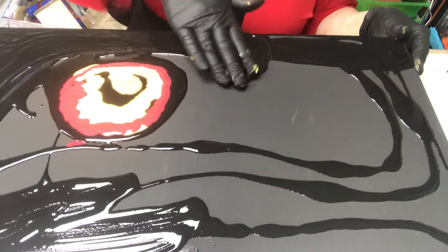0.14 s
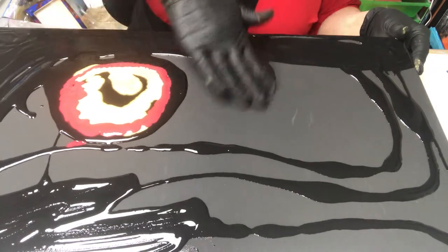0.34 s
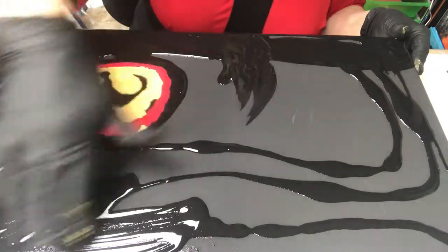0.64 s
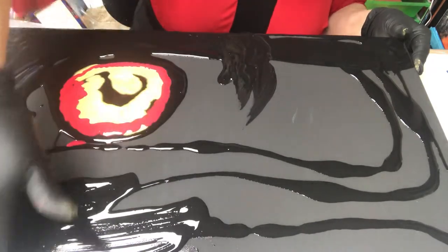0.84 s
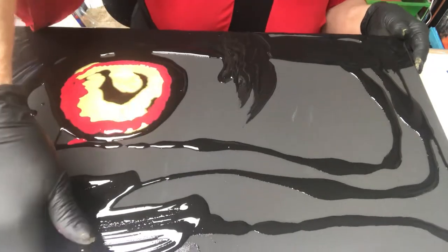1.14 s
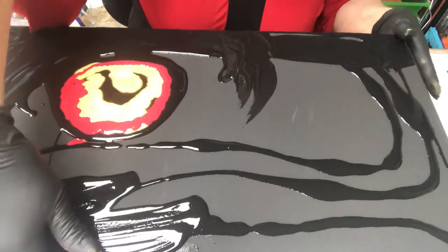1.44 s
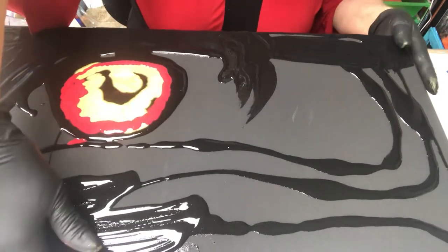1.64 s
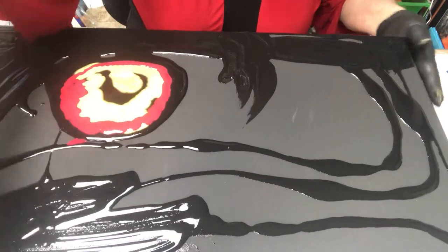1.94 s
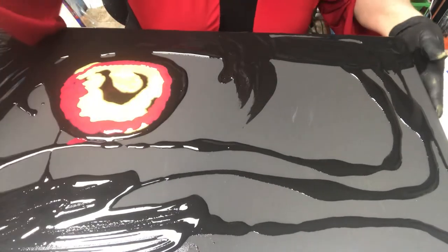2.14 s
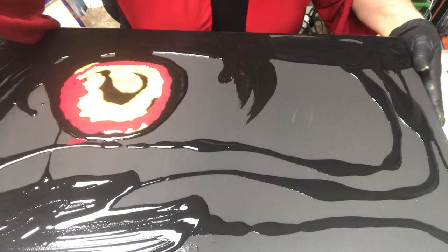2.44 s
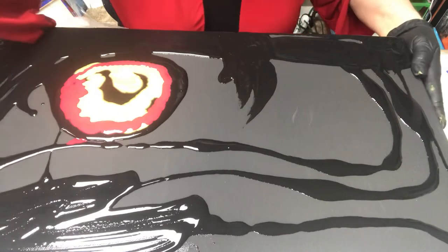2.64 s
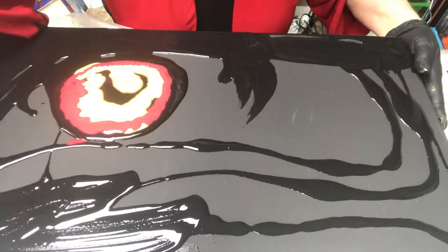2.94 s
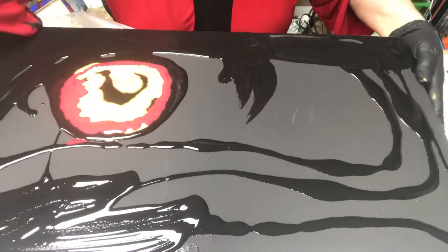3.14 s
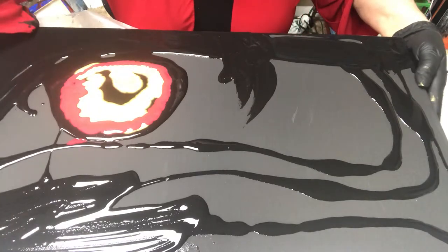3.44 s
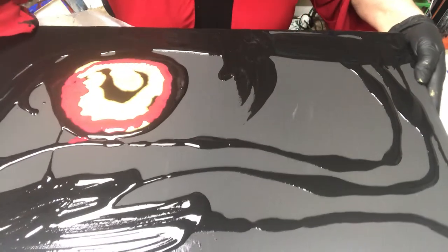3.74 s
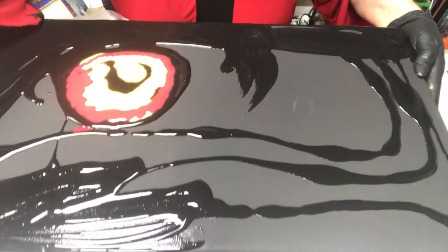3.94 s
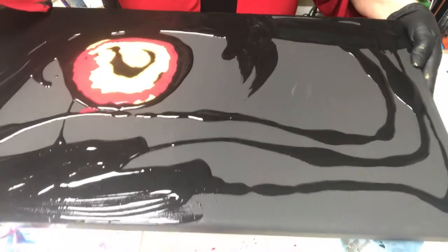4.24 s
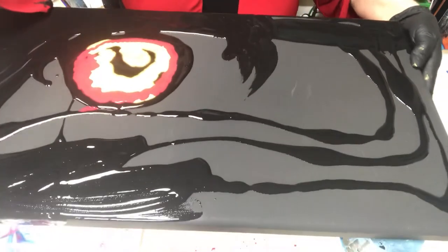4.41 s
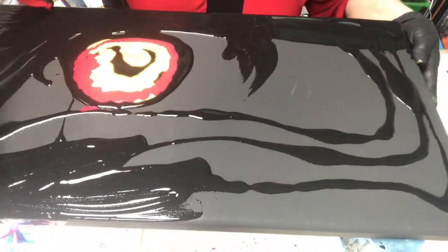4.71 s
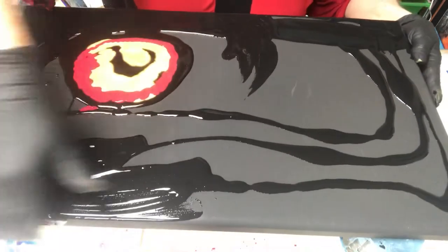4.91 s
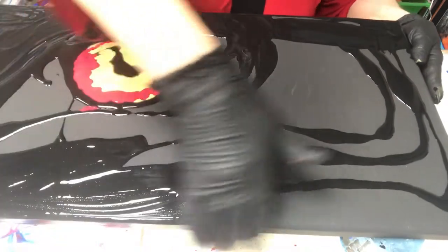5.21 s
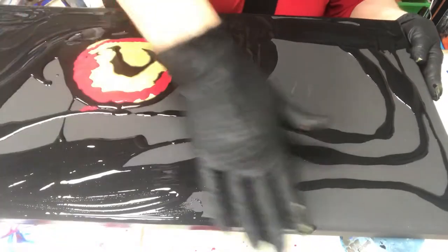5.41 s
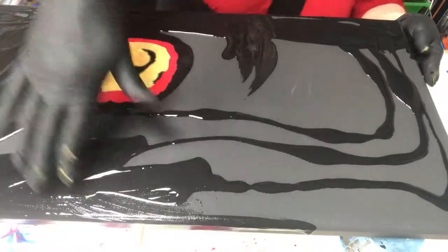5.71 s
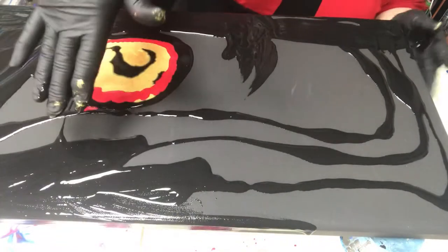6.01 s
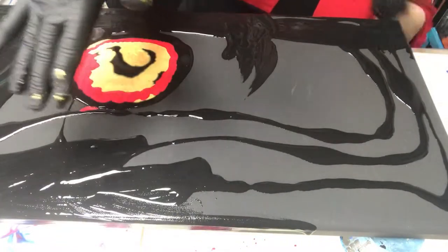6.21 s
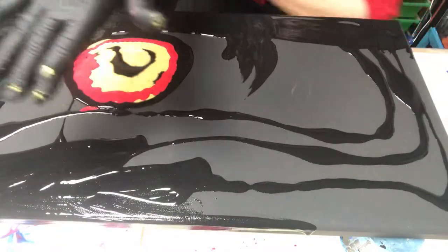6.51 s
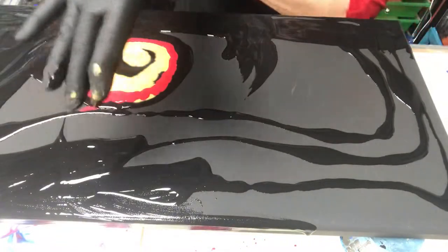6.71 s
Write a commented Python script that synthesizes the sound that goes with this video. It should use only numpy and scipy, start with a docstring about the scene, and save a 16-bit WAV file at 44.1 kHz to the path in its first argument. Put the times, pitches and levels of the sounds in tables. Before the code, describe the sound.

A close, mostly quiet indoor scene with little reverberation; faint sleeve rustle, glove crinkle and bass-heavy room air run throughout. From 0 to 0.5 s a rubber glove swishes softly through wet paint, the second swipe quicker and hissier, with a faint tap at 0.2. Dry, soft rubs begin around 0.9; a hollow knock with a low thud lands at 1.2, others at 1.55 and 2.0. Sticky ticks pop near 2.1, 2.55 and 2.9 among slightly squeaky rubs. More rubs and small taps come at 3.3-3.7. From 3.85 to 4.4 the frame drags: a low, juddering stick-slip groan, falling in pitch, with gritty scraping, wooden bumps near 4.05 and very sharp clicks at 4.35-4.43, the loudest moment. A quiet lull follows. Wet sweeps run 4.5-5.7, quickening, with a knock at 5.2 and a bubbly squelch around 5.6. At 6.07 a dull thump and short skid, then faint rubs fade until 6.9.

```python
"""Gloved fingers smear wet paint over a stretched canvas in a small room: shaped noise hisses and squeaks.
Dry rubs follow, with frame knocks as decaying wood and canvas modes, and sticky ticks as short noise bursts.
Midway the frame is dragged: a stick-slip tone groans near the canvas resonance, with scrapes, bumps, clicks.
More wet sweeps follow, one with a squelch of tiny decaying sines; then a thump, a skid and fading rubs.
Sleeve rustle, glove crinkle and room air, all coloured noise, run throughout."""
import sys
import numpy as np
from scipy import signal
from scipy.fft import rfft, irfft, next_fast_len
from scipy.io import wavfile
from scipy.ndimage import map_coordinates

SR = 44100
rng = np.random.default_rng(int(sys.argv[2]) if len(sys.argv) > 2 else 0)


def master_out(mix):
    """Clip the mix to full scale and print it as 16-bit PCM to the path in sys.argv[1]."""
    frames = np.transpose(np.atleast_2d(mix))
    ceiling = np.clip(frames, -1, 1)
    pcm = np.round(ceiling * 32767).astype(np.int16)
    wavfile.write(sys.argv[1], SR, pcm)


N = 302526

# glove rubber friction spectrum: [f/Hz, density/dB per Hz]
RUBBER_SPECTRUM = [(530, -68), (900, -22), (1390, -13), (1880, -9.5), (2660, -1.5), (4380, -3), (6060, -8),
                   (12000, -22), (15600, -44)]
# cloth friction spectrum: [f/Hz, density/dB per Hz]
CLOTH_SPECTRUM = [(60, -3), (140, -13), (280, -4), (580, 2), (720, -9), (1200, -3.5), (2000, -10),
                  (4000, -54)]


def amp(db):
    """Decibels to gain."""
    return 10 ** (np.asarray(db) / 20)


def unit(x):
    """Scale to rms 1."""
    return x / np.sqrt(np.mean(x ** 2) + 1e-20)


def along(points, hz):
    """Interpolate (f/Hz, value) points on a log frequency axis."""
    f, v = np.transpose(points)
    return np.interp(np.log(hz + 1), np.log(f + 1), v)


def curves(rows):
    """One value per sample for each column after the time."""
    s, *columns = np.transpose(rows)
    return [np.interp(np.arange(N) / SR, s, c) for c in columns]


def wobble(rate_hz, size=N):
    """Smooth random curve with rate_hz knots per second."""
    knots = rng.standard_normal(int(size * rate_hz / SR) + 4)
    return map_coordinates(knots, [np.arange(size) * rate_hz / SR])


def filtered(x, response):
    """Multiply the spectrum of x by a response of frequency."""
    m = next_fast_len(len(x) + 8192)
    spectrum = rfft(x, m) * response(np.fft.rfftfreq(m, 1 / SR))
    return irfft(spectrum, m)[:len(x)]


def coloured(x, spectrum):
    """Shape x by a dB spectrum, at rms 1."""
    return unit(filtered(x, lambda hz: amp(along(spectrum, hz))))


def resonance(hz, centre_hz, width):
    """Causal band-pass; width is a share of the centre."""
    damping = 1j * hz * width * centre_hz
    return damping / (centre_hz ** 2 - hz ** 2 + damping)


def friction(spectrum, rate_hz, grain_db, size=N):
    """Friction as countless tiny slips (noise) plus larger random ones, rate_hz per second on average."""
    slips = (rng.random(size) < rate_hz / SR) * rng.standard_normal(size)
    return coloured(rng.standard_normal(size) + amp(grain_db) * unit(slips), spectrum)


def add(track, s, x):
    """Mix x into the track at s seconds."""
    part = track[round(s * SR):][:len(x)]
    part += x[:len(part)]


def smears():
    """Hand sweeps through wet paint gather speed until a quick lift-off."""
    # sweeps: [start t/s, end t/s, rasp level/dB, hiss level/dB, murmur level/dB, squeak level/dB, squeak f/Hz]
    sweeps = [(-.25, 0.205, -63.5, -67.5, -66.5, -64.5, 4210),
              (0.292, 0.497, -57.5, -50.5, -54.5, -56.5, 4740),
              (4.519, 5.374, -62, -61.5, -81, -66.5, 3586), (5.352, 5.736, -60.5, -58.5, -69.5, -59, 4565),
              (5.514, 5.66, -52.5, -64, -66, -54.5, 3413), (5.636, 5.734, -55, -64.5, -80, -57, 4610)]
    lift_s = 0.046
    out = np.zeros(N)
    for start, end, *levels_and_pitch in sweeps:
        peak = max(1 - lift_s / (end - start), .5)
        add(out, max(start, 0), stroke(start, end, peak, *levels_and_pitch))
    return out


def rubs():
    """Short, drier rubs of the glove on frame and canvas peak early."""
    # rubs: [start t/s, end t/s, rasp level/dB, squeak level/dB, squeak f/Hz]
    dry_rubs = [(0.909, 1.117, -67, -86, 3480), (1.2, 1.512, -62, -86, 3920),
                (1.939, 2.023, -70.5, -67.5, 2960), (2.047, 2.315, -66.5, -73, 2440),
                (2.32, 2.462, -62, -63.5, 3320), (2.43, 2.87, -65.5, -69, 2910),
                (2.75, 3.156, -72, -72, 2970), (3.321, 3.424, -61, -68, 3950),
                (3.508, 3.72, -58, -65, 2060), (3.718, 4.116, -64, -67, 2444),
                (4.097, 4.322, -59, -60, 3575), (4.74, 5.323, -69.5, -69, 1206),
                (5.781, 6.29, -71.5, -75, 1268), (6.007, 6.18, -64, -66, 2630),
                (6.52, 6.892, -68.5, -79, 3630)]
    peak = 0.21  # share of the rub spent gathering speed
    hiss_rel_db, murmur_rel_db = -16.5, -3  # relative to the rasp setting
    out = np.zeros(N)
    for start, end, db, squeak_db, squeak_hz in dry_rubs:
        rub = stroke(start, end, peak, db, db + hiss_rel_db, db + murmur_rel_db, squeak_db, squeak_hz)
        add(out, start, rub)
    return out


def stroke(start, end, peak, rasp_db, hiss_db, murmur_db, squeak_db, squeak_hz):
    """The glove rasps and squeaks where it grips, hisses over wet paint and stirs the cloth beneath."""
    # wet paint spectrum: [f/Hz, density/dB per Hz]
    wet_spectrum = [(240, -59), (400, -18), (654, -12), (798, -5), (903, -7.5), (1150, -2), (1920, -11),
                    (2990, -8), (5360, -7.5), (6540, -9.5), (11900, -11), (15700, -11.5)]
    hiss_power, murmur_power = 1.83, 0.56  # powers of hand speed; the rasp follows speed directly
    t = np.arange(round(max(start, 0) * SR), round(end * SR)) / SR
    size = len(t)
    done = (t - start) / (end - start)
    gather = np.sin(np.pi / 2 * np.clip(done / peak, 0, 1))
    lift = 1 - np.clip((done - peak) / (1 - peak), 0, 1) ** 3  # leaves more abruptly than it arrives
    speed = gather * lift
    rub = friction(RUBBER_SPECTRUM, rate_hz=170, grain_db=-5, size=size)
    grip = amp(rasp_db) * rub + amp(squeak_db) * squeak(squeak_hz, size)
    rasp = amp(1.37 * wobble(88.2, size)) * grip
    hiss = amp(hiss_db + 4.0) * friction(wet_spectrum, rate_hz=1600, grain_db=-7, size=size)
    cloth = friction(CLOTH_SPECTRUM, rate_hz=300, grain_db=-4, size=size)
    murmur = amp(murmur_db + 1.3 * wobble(30.6, size)) * cloth
    mix = speed * rasp + speed ** hiss_power * hiss + speed ** murmur_power * murmur
    return amp(0.67 * wobble(28.2, size)) * mix


def squeak(pitch_hz, size):
    """Taut rubber rings in a fuzzy band whose pitch wanders with the grip."""
    # band width, fuzzier when high: [f/Hz, width/share of pitch]
    band_width = [(1200, .17), (3550, .22), (4500, .45)]
    drift, drift_rate_hz = .035, 22  # share of pitch; wanders per second
    pitch = pitch_hz * (1 + drift * wobble(drift_rate_hz, size))
    phase = 2 * np.pi * np.cumsum(pitch) / SR
    width_hz = along(band_width, pitch_hz) * pitch_hz
    return unit(wobble(width_hz, size) * np.cos(phase) + wobble(width_hz, size) * np.sin(phase))


def squelch(count):
    """Paint peels off the glove in a rush of tiny bubbles, each a decaying sine of its own pitch and level."""
    middle_s, spread_s, level_db, centre_hz = 5.605, .05, -48, 2650
    scatter_octaves, scatter_db, t60_s = .2, 8.5, .014
    out, t = np.zeros(N), np.arange(SR // 40) / SR
    for when, pitch, size in rng.uniform(-0.86, 1, (count, 3)):
        hz = centre_hz * 2 ** (scatter_octaves * pitch)
        envelope = amp(level_db + scatter_db * size - 60 * t / t60_s)
        add(out, middle_s + spread_s * when, envelope * np.sin(2 * np.pi * hz * t))
    return out


def skid():
    """The glove skids off the frame: rubber and cloth friction start at once and die away."""
    start_s, level_db, t60_s = 6.068, -44.5, 0.18
    out, t = np.zeros(N), np.arange(SR // 2) / SR
    rubber = friction(RUBBER_SPECTRUM, rate_hz=270, grain_db=-4, size=len(t))
    cloth = amp(1) * friction(CLOTH_SPECTRUM, rate_hz=93, grain_db=-5, size=len(t))
    envelope = amp(level_db - 60 * t / t60_s) * (1 - np.exp(-t / 0.0024))
    add(out, start_s, envelope * amp(1.7 * wobble(110, len(t))) * (rubber + cloth))
    return out


def dragging():
    """The frame sticks and slips, louder and cleaner near the canvas resonance; slips pulse the grit scrape."""
    # stick-slip rate: [t/s, rate/slips per second]
    slip_rate = [(3.83, 182), (3.925, 246), (3.98, 204), (4.02, 192), (4.06, 149), (4.115, 128.5),
                 (4.17, 143), (4.21, 142), (4.375, 150), (4.41, 127)]
    # tugs: [start t/s, end t/s, groan level at resonance/dB, octave level re groan/dB]
    tugs = [(3.855, 3.975, -19.5, -29), (3.983, 4.044, -23.5, -30), (4.05, 4.127, -22.5, -20),
            (4.111, 4.188, -31.5, -0.5), (4.15, 4.4, -19.5, -27)]
    # scrapes over grit: [start t/s, end t/s, level/dB]
    scrapes = [(3.689, 4.15, -57), (4.067, 4.248, -47), (4.19, 4.393, -41.5)]
    # grit spectrum: [f/Hz, density/dB per Hz]
    grit_spectrum = [(150, -14), (280, 2.5), (390, -2.5), (520, 1), (660, -17.5), (950, -5), (1800, -19),
                     (2800, -26.5), (3600, -21), (5000, -33.5), (15000, -44)]
    canvas_hz, canvas_width = 141.6, .17  # width as a share of the centre
    rough_free, rough_locked = 0.551, 0.12  # roughness 0-1, off and on resonance
    judder_db = -3.5  # irregular shudder, re groan
    judder_spectrum = [(25, -30), (45, -2), (90, -1), (130, 12), (220, 12.5), (290, 0), (400, -36)]

    rate, = curves(slip_rate)
    lock = abs(resonance(rate, canvas_hz, canvas_width))
    level = lock * sum(amp(db) * tug(start, end) for start, end, db, _ in tugs)
    octave = lock * sum(amp(db + octave_db) * tug(start, end) for start, end, db, octave_db in tugs)
    rough = rough_free + (rough_locked - rough_free) * lock
    phase = 2 * np.pi * np.cumsum(rate * (1 + 0.0857 * rough * wobble(110))) / SR
    tone = level * np.sin(phase) + octave * np.sin(2 * phase)
    tone = tone * amp(4.1 * rough * wobble(130))
    judder = coloured(rng.standard_normal(N), judder_spectrum)
    groan = tone + amp(judder_db + 3.7 * wobble(35)) * level * rough * judder
    stutter = amp(2.8 * wobble(110)) * (1 + .8 * np.cos(phase))
    scrape = sum(amp(db) * tug(start, end) for start, end, db in scrapes)
    return groan + scrape * stutter * friction(grit_spectrum, rate_hz=380, grain_db=-9.5)


def tug(start, end):
    """Pull of one tug, 0-1: a half sine leaning early and raised to a fuller arch."""
    arch, lean = 0.62, 0.68  # exponents; lean under 1 peaks early
    done = np.clip((np.arange(N) / SR - start) / (end - start), 0, 1)
    return np.clip(np.sin(np.pi * done ** lean), 0, 1) ** arch


def knocks():
    """Each blow slaps and chatters, rings the wood briefly and leaves the canvas booming."""
    # blows: [t/s, level/dB, boom re level/dB, slap re level/dB, wood centre f/Hz, boom centre f/Hz]
    blows = [(0.216, -46.5, -23, -13, 565, 160), (1.176, -49.5, 0, -20, 500, 150),
             (1.223, -34.5, -6, -9, 794, 130), (1.229, -31, -6, -15, 560, 195),
             (1.564, -31, -18, -23, 700, 182), (1.766, -42.5, -4, -17, 780, 136),
             (1.785, -47, -7.5, -29, 550, 160), (2.024, -31.5, -5, -14, 770, 108),
             (2.089, -44.5, -9, -9, 564, 130), (3.313, -45.5, -5.5, -15, 398, 226),
             (3.57, -42.5, -11.5, -20, 540, 165), (3.722, -46.5, -1, -3, 656, 219),
             (4.044, -22.5, -7, -10, 630, 220), (4.092, -26.5, -3, -10, 800, 172),
             (4.097, -24, -13, -21, 650, 180), (4.386, -31, -7, -17, 945, 98),
             (4.43, -34, -10.5, -15.5, 560, 140), (5.178, -39, -13.5, -6, 600, 239),
             (6.072, -35.5, -8, -10, 315, 236)]
    # wooden frame modes: [f/Hz, level/dB, t60/s]
    wood_modes = [(286, -0.5, 0.048), (356.5, -3, 0.097), (418, -5.5, 0.07), (495, 1, 0.067),
                  (529, -6.5, 0.06), (585.6, 0, 0.068), (714, -10.5, 0.083), (786, -2.5, 0.054),
                  (868, -5.5, 0.057), (988, 0.5, 0.03), (1060, 1, 0.044), (1360, -4, 0.018)]
    # stretched canvas modes: [f/Hz, level/dB, t60/s]
    canvas_modes = [(49.4, -6, 0.51), (78.7, -2, 0.2), (113.7, -5, 0.17), (144.7, -1.5, 0.23),
                    (169.4, -6.5, 0.21), (215.2, -3, 0.13), (254.4, -2.5, 0.089)]
    # contact slap spectrum: [f/Hz, density/dB per Hz]
    slap_spectrum = [(500, -42), (1200, 4), (2000, -2.5), (3500, -8), (5000, -19.5), (14000, -30)]
    chatter_depth_db, chatter_rate_hz = 4.5, 212
    out, t = np.zeros(N), np.arange(SR // 4) / SR
    for s, db, boom_db, slap_db, wood_hz, boom_hz in blows:
        wood = amp(-10.0) * ring(wood_modes, t, wood_hz, width=0.78, attack_s=0.0008, scatter_db=2.5)
        boom = ring(canvas_modes, t, boom_hz, width=1.0, attack_s=0.00049, scatter_db=1.0)
        boom = amp(boom_db - 3.5) * boom
        decay = amp(-60 * t / 0.039) + amp(-16 - 60 * t / 0.12)
        contact = decay * (1 - np.exp(-t / 0.000085))
        chatter = amp(chatter_depth_db * wobble(chatter_rate_hz, len(t)))
        noise = coloured(rng.standard_normal(len(t)), slap_spectrum)
        slap = amp(slap_db) * contact * unit(chatter * noise)
        add(out, s, amp(db) * (wood + boom + slap))
    return out


def ring(modes, t, centre_hz, width, attack_s, scatter_db):
    """Damped modes, favoured near the centre of the blow; unit deviation over the first 20 ms."""
    hz, db, t60 = np.transpose(modes)[:, :, None]
    hz = hz * (1 + 0.016 * rng.standard_normal(hz.shape))  # the holding hand detunes the modes
    favour = abs(resonance(hz, centre_hz, width)) ** 2
    decay = amp(db + scatter_db * rng.standard_normal(hz.shape) - 60 * t / t60)
    waves = np.sin(2 * np.pi * (hz * t + rng.random(hz.shape)))
    x = np.sum(favour * decay * waves, axis=0) * (1 - np.exp(-t / attack_s))
    return x / np.std(x[:SR // 50])


def ticks():
    """Tacky paint lets go of the glove in narrow noise bursts."""
    # releases: [t/s, level/dB, pitch f/Hz]
    releases = [(2.0997, -36.5, 2460), (2.1556, -32.5, 2450), (2.5392, -35, 2180), (2.593, -44.5, 2300),
                (2.906, -32.5, 2300), (2.967, -41, 2900), (4.346, -27.5, 3270)]
    out = np.zeros(N)
    for s, db, pitch_hz in releases:
        add(out, s, amp(db) * snap(pitch_hz, width=0.6, t60_s=0.013))
    return out


def clicks():
    """The frame clicks on its supports in sharp, mostly broad noise bursts."""
    # contacts: [t/s, level/dB, pitch f/Hz, width/share of pitch, t60/s]
    contacts = [(1.316, -41, 4280, 1.2, 0.028), (2.325, -38, 3700, 1.4, 0.014),
                (3.7205, -32.5, 4830, 1.3, 0.013), (3.937, -41, 5460, 1.6, 0.012),
                (4.354, -22.5, 3944, 1.8, 0.023), (4.355, -18.5, 8970, 0.16, 0.0068),
                (4.4269, -13.5, 9200, 6.9, 0.0036), (5.178, -35, 4750, 1.9, 0.012),
                (5.928, -48.5, 4150, 1, 0.083), (6.67, -52, 2900, 1.7, 0.063)]
    out = np.zeros(N)
    for s, db, pitch_hz, width, t60_s in contacts:
        add(out, s, amp(db) * snap(pitch_hz, width, t60_s))
    return out


def snap(pitch_hz, width, t60_s):
    """Short noise burst around one pitch with a faint afterglow."""
    rise_s = 0.0003
    t = np.arange(SR // 10) / SR
    noise = rng.standard_normal(len(t))
    burst = unit(filtered(noise, lambda hz: resonance(hz, pitch_hz, width) ** 2))
    decay = amp(-60 * t / t60_s) + amp(-37 - 60 * t / 0.052)
    return amp(-4.5) * burst * (1 - np.exp(-t / rise_s)) * decay


def thuds():
    """Damped low noise swells as the frame shifts, then dies away."""
    # shifts: [start t/s, level/dB, centre f/Hz, rise/s, t60/s]
    shifts = [(1.2245, -27, 195, .006, .085), (2.03, -46.5, 125, 0.037, 0.38),
              (4.634, -47, 135, 0.051, 0.23), (5.8, -57, 220, 0.31, .6), (6.069, -39, 365, .004, .2)]
    width = 1.05  # share of the centre
    out, t = np.zeros(N), np.arange(SR) / SR
    for s, db, centre_hz, rise_s, t60_s in shifts:
        noise = rng.standard_normal(SR)
        body = unit(filtered(noise, lambda hz: resonance(hz, centre_hz, width) ** 3))
        decay = amp(db - 60 * np.maximum(t - rise_s, 0) / t60_s)
        add(out, s, decay * np.minimum(t / rise_s, 1) * body)
    return out


def room(x):
    """Convolve with a short diffuse noise tail, duller as it dies, after a 5 ms gap."""
    # room decay: [f/Hz, t60/s]
    room_decay = [(100, 0.55), (600, 0.27), (3000, 0.16), (12000, 0.075)]
    hz, t, z = signal.stft(rng.standard_normal(SR // 2), SR, nperseg=256)
    decay = amp(-60 * t / along(room_decay, hz)[:, None])
    tail = signal.istft(z * decay, SR, nperseg=256)[1]
    tail = np.pad(tail / np.linalg.norm(tail), (SR // 200, 0))
    return signal.fftconvolve(x, tail)[:N]


def sleeves():
    """Sleeve cloth rustles as dull friction with an unsteady level."""
    # sleeve spectrum: [f/Hz, density/dB per Hz]
    sleeve_spectrum = [(40, -4.5), (140, 2), (280, -4.5), (700, -13.5), (3000, -33.5)]
    level = amp(-70.5 + 1.6 * wobble(6.2) + 2.8 * wobble(24))
    return level * friction(sleeve_spectrum, rate_hz=50, grain_db=-9.0)


def crinkle():
    """Gloves crinkle faintly as sparse rubber friction."""
    return amp(-79 + 2.5 * wobble(7)) * friction(RUBBER_SPECTRUM, rate_hz=25, grain_db=-4)


def air():
    """Quiet room air: steady noise, strongest in the bass."""
    # air spectrum: [f/Hz, density/dB per Hz]
    air_spectrum = [(15, -32), (25, -19), (59, -4.5), (169, -34), (275, -17.5), (307, -20), (809, -20),
                    (2020, -23), (15700, -35.5)]
    return amp(-69) * coloured(rng.standard_normal(N), air_spectrum)


def scene():
    """Sum hand, frame and canvas over the background; knocks, ticks and clicks also feed the room tail."""
    hits = knocks() + ticks() + clicks()
    hand = smears() + rubs() + squelch(count=50) + skid()
    frame = dragging() + thuds() + hits + amp(-15.0) * room(hits)
    background = sleeves() + crinkle() + air()
    return (hand + frame + background)[None]


def record(dry):
    """The microphone loses the deepest bass; nothing is kept above the band limit."""
    top_hz = 15850
    bass_cut = lambda hz: (hz / 35) ** 5 / np.sqrt(1 + (hz / 35) ** 10)
    top_cut = lambda hz: np.clip((top_hz - hz) / 300 + .5, 0, 1)
    return filtered(dry[0], lambda hz: bass_cut(hz) * top_cut(hz))[None]


dry = scene()
out = record(dry)
master_out(out)
```